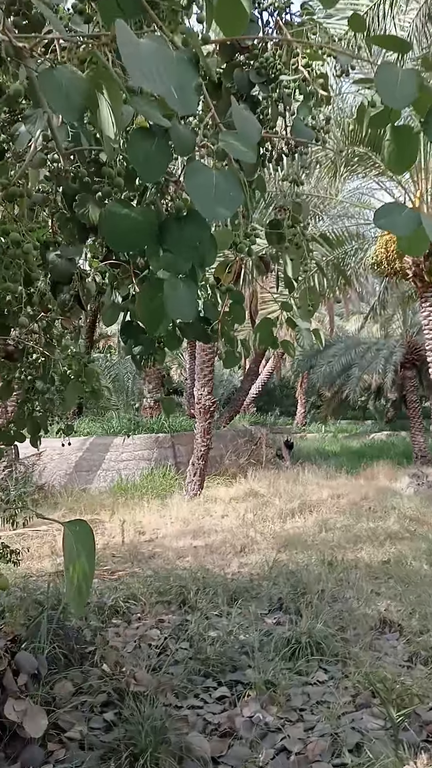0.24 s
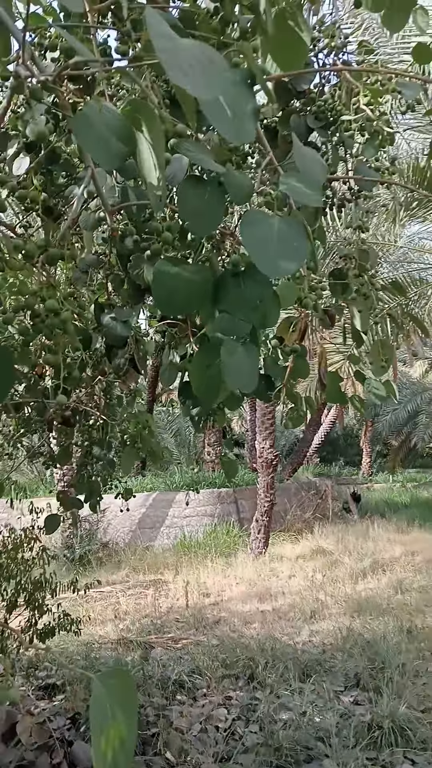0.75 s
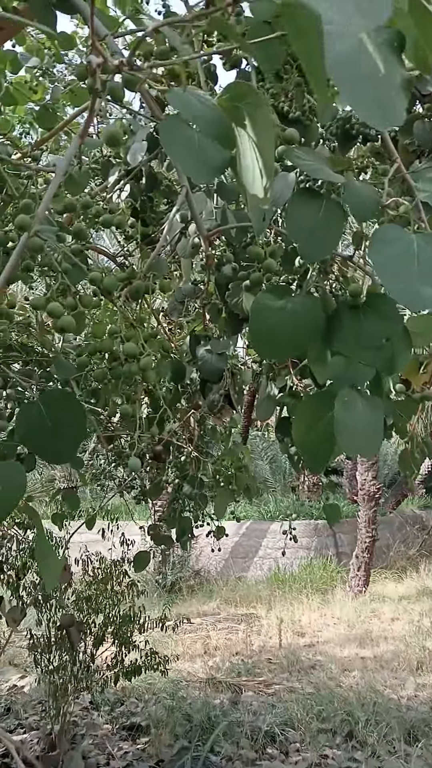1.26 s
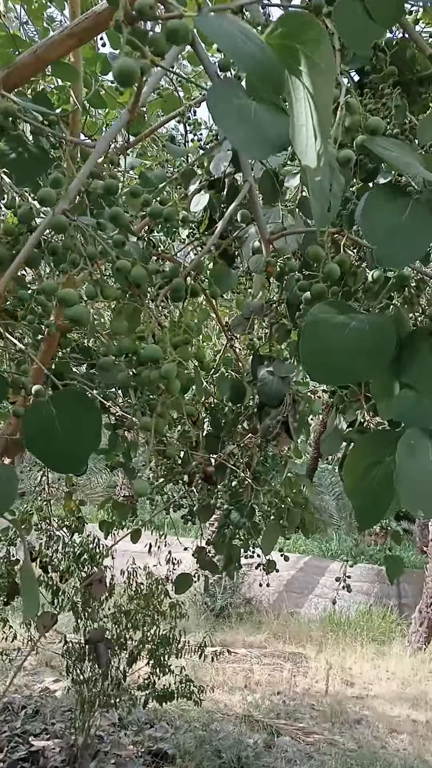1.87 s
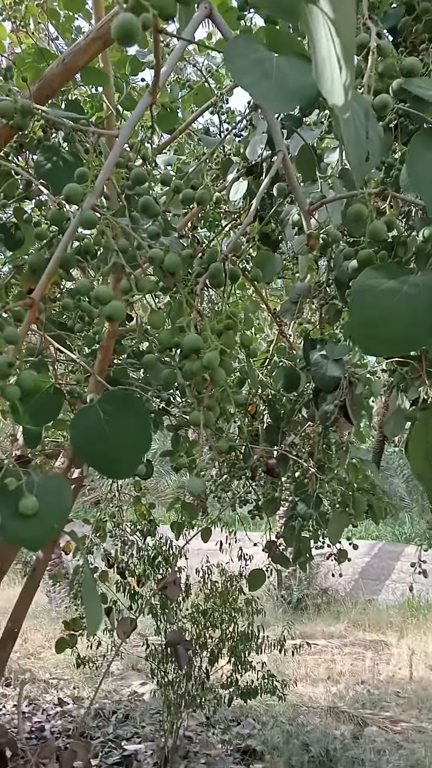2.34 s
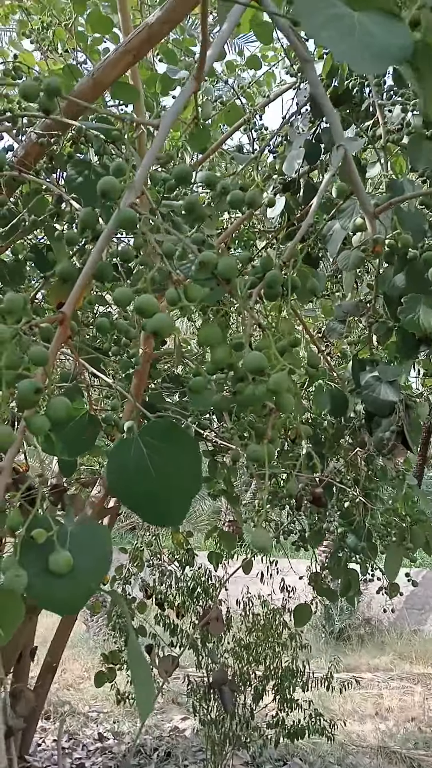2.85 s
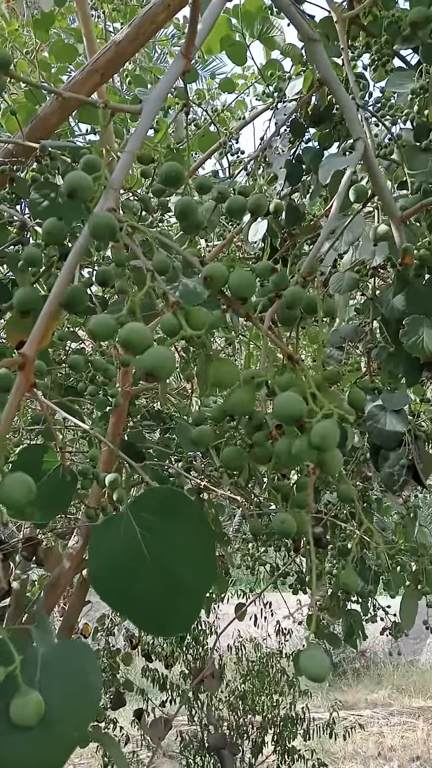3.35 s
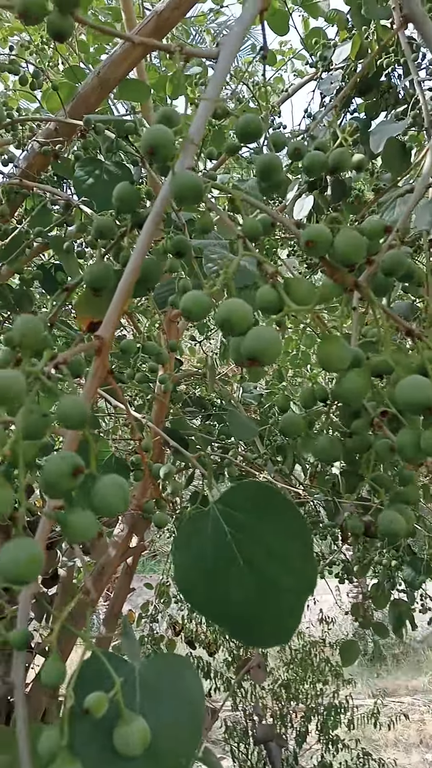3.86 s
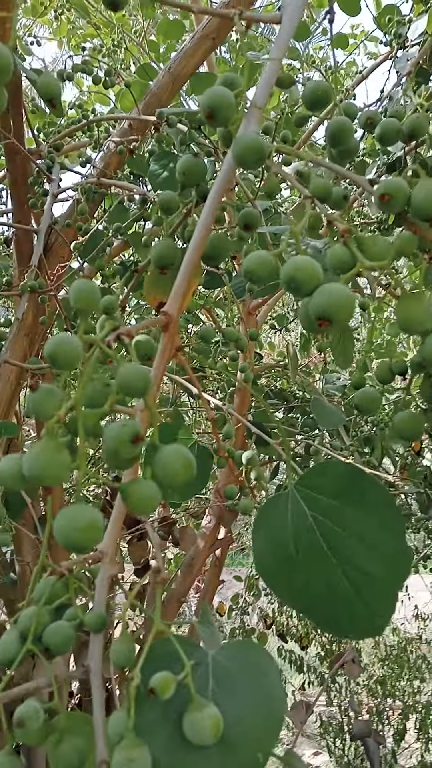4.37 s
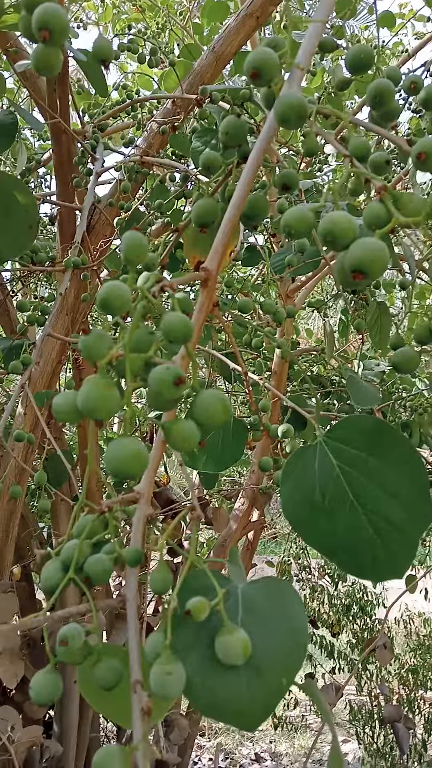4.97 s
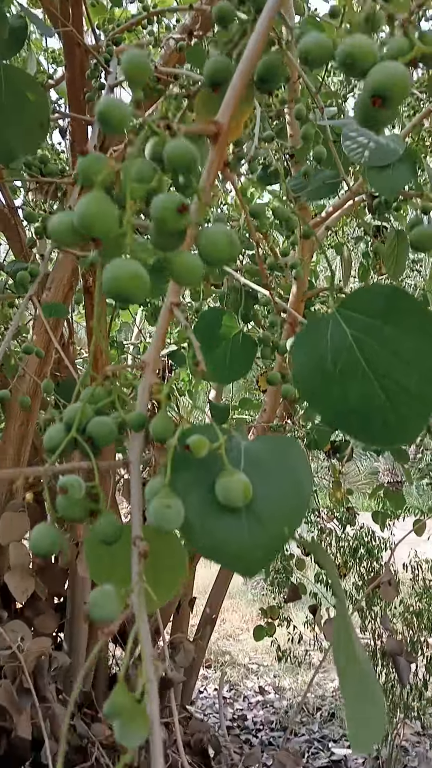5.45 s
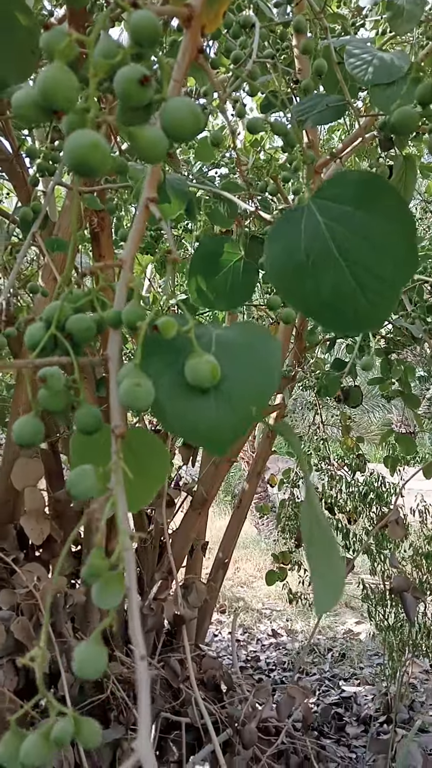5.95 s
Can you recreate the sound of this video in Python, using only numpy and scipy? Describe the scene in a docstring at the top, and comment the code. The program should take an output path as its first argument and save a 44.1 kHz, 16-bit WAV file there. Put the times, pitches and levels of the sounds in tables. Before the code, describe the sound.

Close, bright mono sound of slow walking over dry leaves and grass in a quiet orchard. At 0 s a loud crunch is already under way, a dense crackle with sharp snaps and a few dull sole knocks near 0.2 s, easing by 0.4 s. Lighter rustles follow from 0.5 to 1.0 s, with small stick clicks near 1 s. Firmer crunches come at 1.2-1.7 s and crisp snaps around 1.9-2.0 s. From about 2.1 to 2.6 s it lulls, with a barely audible low bump near 2.2 s. The strongest presses hit at 2.7-3.5 s, dip, and hit again at 3.9-4.1 s with a fuller crunch. Then the tread stops: sparse snaps until 4.7 s, then faint rustles and ticks. A very faint, brief, low-mid distant tone sounds at 5.2 s. Small crackles around 5.5 and 5.9 s finish over soft, steady outdoor air.

```python
"""Someone walks slowly over dry leaves and grass in an orchard, close to a small microphone.
Each press of a foot is a dense crackle of random fractures, with single snaps and damped, resonant knocks.
After a soft low bump and a lull near 2.2 s the tread returns strongly, with loud presses up to about 4 s.
Then the walker stops under a tree and the crackle grows faint; at 5.2 s a short far tone of harmonics sounds.
Quiet outdoor air, made of filtered noise, lies behind it all."""
import sys
import numpy as np
from scipy import signal
from scipy.fft import rfft, irfft, next_fast_len
from scipy.io import wavfile
from scipy.ndimage import uniform_filter1d, map_coordinates

SR = 44100
rng = np.random.default_rng(int(sys.argv[2]) if len(sys.argv) > 2 else 0)


def dump_mix(stems):
    """Bounce the given channels to the path in sys.argv[1] as a 16-bit WAV at rate SR."""
    frames = np.atleast_2d(stems).T  # one column per channel
    limited = np.clip(frames, -1, 1)  # hard clip at full scale
    pcm = np.round(limited * 32767).astype(np.int16)
    wavfile.write(sys.argv[1], SR, pcm)


N = 273861
TIME = np.arange(N) / SR  # seconds

# Presses of a foot into the litter; crisp crackle and crushed body have relative levels:
# full_level_s, attack_s, hold_s, release_s, crisp_db, body_db
FOOT_PRESSES = [(0.025, 0.15, 0.087, 0.37, -21, -27), (.46, 0.042, 0.018, 0.063, -29.5, -35.5),
                (0.581, 0.045, 0.073, 0.097, -32.5, -39), (.715, 0.025, 0.031, 0.12, -33, -40),
                (0.999, 0.12, 0.0047, 0.13, -33.5, -38.5), (1.154, 0.076, 0.0065, 0.09, -26.5, -27.5),
                (1.245, 0.076, 0.048, 0.54, -23, -26.5), (1.471, 0.067, 0.093, 0.051, -29.5, -34.5),
                (1.627, 0.031, 0.014, 0.21, -26, -32), (1.809, 0.072, 0.053, 0.17, -31.5, -37.5),
                (1.93, 0.054, 0.0085, 0.17, -22, -33), (2.043, 0.028, 0.01, .11, -24, -34.5),
                (2.163, 0.22, 0.022, .9, -47, -51.5), (2.72, 0.044, 0.12, 0.073, -16.5, -24.5),
                (2.996, 0.063, 0.076, 0.28, -19, -27), (3.155, .08, 0.011, 0.13, -21, -29.5),
                (3.294, 0.13, 0.026, .08, -28, -36), (3.453, 0.063, 0.073, 0.098, -25.5, -33.5),
                (3.692, 0.14, 0.043, .2, -42.5, -46.5), (3.904, 0.076, 0.011, 0.062, -17.5, -23.5),
                (4.007, 0.037, 0.031, 0.42, -24.5, -31), (4.334, 0.11, .01, 0.043, -35.5, -37),
                (4.485, 0.088, 0.025, 0.18, -45, -51.5), (4.689, 0.19, 0.0068, 0.13, -39, -46),
                (4.766, .06, .03, 0.029, -53, -53.5), (4.993, 0.02, 0.011, 0.056, -49, -56),
                (5.158, .03, 0.22, 0.19, -53.5, -59), (5.533, 0.14, .01, .25, -45.5, -52.5),
                (5.893, 0.22, 0.11, 0.36, -44, -49)]
# Slow change of bass in the crunch: time_s, bass_gain_db
CRUNCH_BASS = [(0, -3.5), (0.7, 2), (1.3, -5), (2.0, -4), (2.8, 2), (3.4, 0.5), (3.9, 6), (4.4, -2.5),
               (6.2, 5.5)]
# Spectrum of the crushed litter: frequency_hz, relative_level_db
LITTER_SPECTRUM = [(35, -77), (60, -37.5), (226, -14.5), (278, -15.5), (394, -15.5), (433, -11), (756, -14),
                   (1350, -10.5), (1830, -8), (2590, -8.5), (4320, -4), (7720, -1.5), (9510, -2),
                   (10900, -5), (15500, -9)]
# Leaves and twigs that snap out of the crackle, relative levels, decay time constant of the amplitude:
# start_s, crisp_peak_db, body_rms_db, ring_hz, breaking_s
LEAF_SNAPS = [(0.0142, -10, -33, 2120, 0.0022), (0.0303, 1, -20, 3800, 0.0026),
              (0.0618, -1.5, -21.5, 1850, 0.0014), (0.0877, -4.5, -20.5, 1800, 0.0015),
              (0.142, -7.5, -25.5, 2190, 0.0025), (0.1666, -12.5, -30, 3860, 0.0017),
              (0.189, -24, -26.5, 1410, 0.0028), (0.2153, -16, -31, 3940, 0.0024),
              (0.3448, -15.5, -27, 1670, 0.0021), (0.382, -14.5, -27, 4200, 0.0023),
              (0.4596, -8, -21.5, 1880, 0.0046), (0.4724, -15, -28.5, 3890, 0.0019),
              (0.5366, -20.5, -38, 4300, 0.0037), (0.5676, -14.5, -37.5, 4400, 0.0016),
              (0.6098, -12.5, -34, 2020, 0.0025), (0.6648, -18, -35, 4110, 0.002),
              (0.719, -18, -48, 4080, 0.0025), (0.8025, -11.5, -33.5, 4330, 0.001),
              (0.842, -25.5, -38.5, 4800, 0.0084), (1.0886, -27, -37, 1590, 0.0035),
              (1.1541, -15, -23, 2110, 0.0038), (1.2281, -8.5, -20, 3700, 0.002),
              (1.2406, -10, -21.5, 2130, 0.0028), (1.2473, -13, -17, 4050, 0.003),
              (1.2645, -9.5, -20, 3230, 0.0019), (1.2806, -7, -22.5, 1690, 0.0028),
              (1.381, -8, -27.5, 1600, 0.0014), (1.471, -10.5, -31.5, 3400, 0.0022),
              (1.5356, -9, -34, 4800, 0.0022), (1.6079, -19, -24.5, 1960, 0.002),
              (1.6385, -10.5, -22.5, 1980, 0.0032), (1.7125, -10, -24.5, 2120, 0.0054),
              (1.845, -15, -27.5, 4250, 0.0023), (1.8866, -9, -29.5, 2100, 0.0011),
              (1.9197, -2.5, -28.5, 2420, 0.0017), (1.9366, -7.5, -36, 3700, 0.0033),
              (1.9793, -7, -25.5, 5280, 0.0011), (2.0002, -4, -28, 4780, 0.0023),
              (2.4657, -33, -37.5, 1820, 0.0032), (2.6058, -25.5, -51, 5030, 0.00095),
              (2.6789, -11.5, -30.5, 4430, 0.0078), (2.7057, -2.5, -21, 2300, 0.0067),
              (2.723, -9, -26, 3800, 0.0045), (2.7335, -4.5, -22, 4270, 0.003),
              (2.8744, -7, -44, 3120, 0.0028), (2.9489, -11, -30.5, 1620, 0.0023),
              (2.9694, -5, -30.5, 5140, 0.0024), (2.9915, -3.5, -25, 4900, 0.0043),
              (3.251, -12, -31, 4500, 0.0028), (3.417, -20, -39, 4200, 0.0024),
              (3.6422, -26.5, -38, 4520, 0.0025), (3.7618, -29, -38.5, 5030, 0.0052),
              (4.0783, -24, -31, 2310, 0.0028), (4.1924, -11, -31, 3630, 0.0057),
              (4.2926, -13.5, -36.5, 3960, 0.0051), (4.4047, -22.5, -49, 3900, 0.0041),
              (4.4804, -18.5, -35.5, 4150, 0.0042), (4.6942, -19.5, -41.5, 4180, 0.0028),
              (4.8189, -48, -46.5, 5070, 0.0016), (4.9908, -42, -52.5, 2080, 0.0028),
              (5.014, -36.5, -45.5, 1870, 0.0021), (5.0613, -35, -52.5, 2070, 0.0028),
              (5.225, -36, -52, 3140, 0.0031), (5.3353, -49, -49.5, 3990, 0.0045),
              (5.4635, -31.5, -41.5, 3820, 0.0063), (5.5235, -26.5, -43.5, 4050, 0.0031),
              (5.6024, -34, -45, 3320, 0.0011), (5.9163, -19, -36.5, 4130, 0.0016),
              (6.0558, -28.5, -51, 1850, 0.0021), (6.1206, -27.5, -46.5, 4060, 0.0032)]
# Spectrum of a single snap before its ring is added: frequency_hz, relative_level_db
SNAP_SPECTRUM = [(40, -34), (150, -22.5), (400, -9), (900, -9.5), (1900, -1.5), (2800, -2), (4100, 3),
                 (5500, 5), (8000, 11.5), (11500, 5), (15500, 6)]
# Dull knocks of soles on the soil, relative levels, time to fall by 60 dB:
# start_s, level_db, pitch_hz, t60_s
SOLE_KNOCKS = [(0.193, -26.5, 407, 0.16), (0.212, -30, 170, 0.066), (0.221, -28.5, 288, 0.064),
               (0.238, -33, 192, 0.066), (2.734, -24, 426, 0.043), (3.891, -32, 490, 0.064),
               (3.912, -22, 412, 0.025), (4.692, -35.5, 390, 0.02), (5.521, -39, 372, 0.029),
               (5.912, -36, 420, 0.034)]
# Light sticks that click against each other, relative levels: start_s, level_db, pitch_hz, t60_s
STICK_CLICKS = [(0.995, -28.5, 1190, 0.09), (1.03, -32.5, 993, 0.044), (3.761, -39, 1030, 0.061),
                (4.569, -39.5, 548, 0.035), (5.667, -51.5, 960, 0.035), (5.963, -43.5, 835, 0.03)]
# Spectrum of the still air: frequency_hz, relative_level_db
AIR_SPECTRUM = [(15, -35), (25, -20), (113, -2), (188, -5.5), (722, -11.5), (2920, -8.5), (3530, -12),
                (3830, -13.5), (7910, -8), (9300, -13.5), (12000, -18), (15500, -29)]
# Partials of the far tone: frequency_multiple (no unit), relative_level_db
TONE_PARTIALS = [(1, 0), (2, 0), (3, -8), (4, -6), (5, -6), (6, -10)]
# Peaks and notch of the microphone port, Gaussian widths: centre_hz, width_hz, gain_db
PORT_RESONANCES = [(1850, 190, 1), (4190, 523, 4), (7810, 355, -4.5), (9510, 680, 7.5)]

SPLIT_HZ = 2700  # border between the body and the crisp part of a sound
TOP_HZ = 15700  # band limit of the microphone
LEAF_CUT_HZ = 100  # thin leaves radiate little below this
RAMP_DB = 20  # rise within an attack and fall within a release
# the hiss of leaves springing back after a press, its fading and its upper cut: duller than the crunch
SETTLE_DB, SETTLE_DB_PER_S, SETTLE_TOP_HZ = -23, 28, 10100
UNEVEN_DB, UNEVEN_PER_S = 1.5, 45  # the litter gives way in clumps
# rate of breaks at one crisp level, and the power by which it grows with the crisp gain
BREAKS_PER_S, BREAKS_AT_DB, BREAKS_GROW = 520, -27.5, .56
SCATTER_DB, SCATTER_S = -17, .012  # the crumbs and echoes that trail a snap
CRACK_RISE_S, RAGGED_DB = 0.00048, 2.2  # how fast a crack opens; how unevenly it runs
RING_DB, RING_WIDTH_HZ = 8, 400  # resonance of the piece that breaks
SNAP_CREST_DB = 22  # allowance for a snap's peak over its mean level
SNAP_CORE_S = 0.0072  # duration to which the body's energy is referred
# stray snaps: peak over the crackle, body over the crushed body, and the largest deviation of each
STRAY_DB, STRAY_BODY_DB, STRAY_SPREAD_DB = 7.5, -2.5, 3
# strays follow the crackle's level less than fully, so they stand out where it is quiet
STRAY_FOLLOW, STRAY_AT_DB = .85, -37
STRAY_LOW_HZ, STRAY_HIGH_HZ = 1090, 5560  # range of their pitches


def steps():
    """Load-dependent fracture: a harder press cracks louder and denser; the crunch's depth drifts over time."""
    crisp_gain, body_gain, settling = pressing()
    rate = BREAKS_PER_S * (crisp_gain / amp(BREAKS_AT_DB)) ** BREAKS_GROW
    litter = lambda hz: amp(along(LITTER_SPECTRUM, hz))
    body, crisp = split(colour(crackle(rate, spread_db=1.5), litter))

    bass = signal.sosfiltfilt(signal.butter(2, 520, fs=SR, output="sos"), body)
    bass_gain = amp(np.interp(TIME, *np.transpose(CRUNCH_BASS)))
    body = body + bass * (bass_gain - 1)
    crunch = amp(-0.9) * body_gain * unit(body) + amp(-4.0) * crisp_gain * unit(crisp)
    crunch *= amp(UNEVEN_DB * wobble(UNEVEN_PER_S))

    dull_litter = lambda hz: litter(hz) / np.hypot(1, (hz / SETTLE_TOP_HZ) ** 3)
    hiss = unit(colour(rng.standard_normal(N), dull_litter))
    return crunch + amp(SETTLE_DB) * settling * hiss


def pressing():
    """Summation of energy: presses swell, hold and decay exponentially; gives crisp, body and settling gains."""
    crisp, body, settling = np.zeros((3, N)) + 1e-12
    for full_s, attack, hold, release, crisp_db, body_db in FOOT_PRESSES:
        rise_db = RAMP_DB * np.minimum(TIME - full_s, 0) / attack
        since = np.maximum(TIME - full_s - hold, 0)
        shape = amp(np.maximum(rise_db - RAMP_DB * since / release, -120))
        crisp += (amp(crisp_db) * shape) ** 2
        body += (amp(body_db) * shape) ** 2
        settling_db = crisp_db + rise_db - SETTLE_DB_PER_S * since
        settling += amp(np.maximum(settling_db, -120)) ** 2
    return np.sqrt([crisp, body, settling])


def crackle(rate, spread_db, count=11):
    """Random impulses exciting resonances: breaks of unequal size, each favouring the pitches of its leaf."""
    size = amp(spread_db * np.minimum(rng.standard_normal(N), 1.7)) ** 2
    breaks = (rng.random(N) < rate / SR) * size
    leaves = np.zeros(N)
    for ring_hz in np.geomspace(330, 13000, count):
        share = amp(4.1 * np.minimum(rng.standard_normal(N), 2)) ** 2
        band = lambda hz: np.exp(-9 * np.log((hz + 1) / ring_hz) ** 2) + .05 / (1 + hz / 300)
        leaves += colour(fractures(breaks * share, rub_db=-6), band)
    # the soil under the leaves adds a dull grain
    soil = colour(fractures(breaks, rub_db=-1), lambda hz: 0.71 / (1 + (hz / 240) ** 4))
    return unit(leaves + soil)


def fractures(breaks, rub_db):
    """Shot noise: each break sets off a brief noise burst over the rub of leaf on leaf, at a steady level."""
    burst = fading(crack_s=.0008, scatter_db=-13, scatter_s=.005)
    energy = np.abs(signal.oaconvolve(breaks, burst)[:N])
    local_mean = uniform_filter1d(uniform_filter1d(energy, size=1300), size=1300)
    energy /= np.abs(local_mean) + 1e-4
    return np.sqrt(energy + amp(rub_db) ** 2) * rng.standard_normal(N)


def fading(crack_s, scatter_db, scatter_s):
    """Double exponential decay of energy: the crack itself, then its scatter from ground and foliage."""
    t = np.arange(SR // 20) / SR
    return np.exp(-2 * t / crack_s) + amp(scatter_db) ** 2 * np.exp(-2 * t / scatter_s)


def snaps(rows):
    """Brittle fracture: a sharp crack runs on raggedly, coloured by the resonance of the leaf or twig."""
    out = np.zeros(N + SR)
    for start_s, crisp_db, body_db, ring_hz, breaking_s in rows:
        energy = fading(breaking_s, SCATTER_DB, SCATTER_S)
        length = len(energy)
        opening = 1 - np.exp(-np.arange(length) / SR / CRACK_RISE_S)
        ragged = amp(RAGGED_DB * unit(uniform_filter1d(rng.standard_normal(length), size=30)))
        burst = opening * np.sqrt(energy) * ragged * rng.standard_normal(length)

        ring_db = lambda hz: RING_DB / (1 + ((hz - ring_hz) / RING_WIDTH_HZ) ** 2)
        body, crisp = split(colour(burst, lambda hz: amp(along(SNAP_SPECTRUM, hz) + ring_db(hz))))
        body /= np.sqrt(np.sum(body ** 2) / (SNAP_CORE_S * SR))
        snap = amp(crisp_db - SNAP_CREST_DB) * unit(crisp) + amp(body_db) * body
        out[round(start_s * SR):][:length] += snap
    return out[:N]


def strays(count=130):
    """Fracture strength follows load: small snaps at random moments, scaled by the press, as snap rows."""
    crisp_gain, body_gain, _ = pressing()
    when, pitch, crisp_size, body_size = rng.random((count, 4)).T
    at = (when * N).astype(int)
    crisp_db, body_db = 20 * np.log10([crisp_gain[at], body_gain[at]])
    lift_db = (STRAY_FOLLOW - 1) * (np.maximum(crisp_db, -60) - STRAY_AT_DB)
    crisp_db += lift_db + STRAY_DB + STRAY_SPREAD_DB * (2 * crisp_size - 1)
    body_db += lift_db + STRAY_BODY_DB + STRAY_SPREAD_DB * (2 * body_size - 1)
    ring_hz = STRAY_LOW_HZ * (STRAY_HIGH_HZ / STRAY_LOW_HZ) ** pitch
    breaking_s = np.full(count, .0014)
    return np.column_stack([at / SR, crisp_db, body_db, ring_hz, breaking_s])


def knocks(blows, level_db, sharpness):
    """Damped resonance: a decaying noise push excites one broad, short resonance at each blow."""
    out, t = np.zeros(N + SR), np.arange(SR // 8) / SR
    for start_s, db, pitch_hz, t60_s in blows:
        push = rng.standard_normal(len(t)) * amp(-60 * t / t60_s)
        detuning = lambda hz: hz / pitch_hz - pitch_hz / (hz + 1)
        thud = colour(push, lambda hz: 1 / np.hypot(1, sharpness * detuning(hz)) ** 2)
        out[round(start_s * SR):][:len(t)] += amp(db + level_db) * unit(thud)
    return out[:N]


def bounces(x, strength, delay_s, count=3):
    """Reflection: ground and trunks return weak copies, whose delays wander as the walker moves."""
    out = x.copy()
    for k in range(count):
        lag = delay_s * (k + 1) * SR * np.exp(.2 * wobble(5))  # samples
        out += strength * np.interp(np.arange(N) - np.round(lag), np.arange(N), x)
    return out / np.sqrt(1 + count * strength ** 2)


def background():
    """Filtered noise and harmonic synthesis: still air, one soft low bump and a short tone from far away."""
    air = unit(colour(rng.standard_normal(N), lambda hz: amp(along(AIR_SPECTRUM, hz))))
    air *= amp(-57.5 + 0.5 * wobble(4.43))

    bump = unit(colour(rng.standard_normal(N), lambda hz: 1 / (1 + ((hz - 72) / 18) ** 2)))
    bump *= amp(-56.0) * swell(2.235, 0.037)

    pitch_hz = 305 * (1 + 0.00695 * wobble(43))
    phase = 2 * np.pi * np.cumsum(pitch_hz) / SR
    tone = unit(sum(amp(db) * np.sin(multiple * phase) for multiple, db in TONE_PARTIALS))
    tone *= amp(-57.5 + 2.5 * wobble(60)) * swell(5.2, .03)
    return air + bump + tone


def swell(centre_s, width_s):
    """Gaussian envelope: a bell-shaped rise and fall."""
    return np.exp(-.5 * ((TIME - centre_s) / width_s) ** 2)


def wobble(rate):
    """Interpolated randomness: a smooth random curve with rate knots a second."""
    knots = rng.standard_normal(int(N * rate / SR) + 4)
    return map_coordinates(knots, [TIME * rate])


def colour(x, gain):
    """Minimum-phase filtering: folding the cepstrum makes a causal filter with the given gain against Hz."""
    size = 2 * next_fast_len(len(x) // 2 + 2048)
    cepstrum = irfft(np.log(np.maximum(gain(np.fft.rfftfreq(size, 1 / SR)), 1e-6)))
    cepstrum[1:size // 2] *= 2
    cepstrum[size // 2 + 1:] = 0
    return irfft(rfft(x, size) * np.exp(rfft(cepstrum)), size)[:len(x)]


def split(x):
    """Band division: low-pass and high-pass filters give the body and the crisp part of a sound."""
    filters = [signal.butter(3, SPLIT_HZ, side, fs=SR, output="sos") for side in ("low", "high")]
    return [signal.sosfilt(sos, x) for sos in filters]


def along(points, hz):
    """Logarithmic interpolation: (Hz, value) points read on a log frequency axis."""
    f, v = np.transpose(points)
    return np.interp(np.log(hz + 1), np.log(f + 1), v)


def amp(db):
    """Level to amplitude: decibels become a linear gain."""
    return 10 ** (np.asarray(db) / 20)


def unit(x):
    """Power normalisation: scale to rms 1."""
    return x / np.sqrt(np.mean(x ** 2) + 1e-20)


def scene():
    """Superposition: steps, snaps and knocks add, are reflected, and stand before the background."""
    high_pass = lambda hz: hz ** 2 / np.hypot(hz ** 2, LEAF_CUT_HZ ** 2)
    leaves = colour(steps() + snaps(LEAF_SNAPS) + snaps(strays()), high_pass)
    blows = knocks(SOLE_KNOCKS, level_db=-18.5, sharpness=1.36)
    blows += knocks(STICK_CLICKS, level_db=-15.5, sharpness=2.1)
    return (bounces(leaves + blows, strength=0.17, delay_s=.0012) + background())[None]


def record(dry):
    """Resonance and saturation: the port colours the treble, hard cracks are rounded, the band is limited."""
    bell = lambda hz, centre, width: np.exp(-.5 * ((hz - centre) / width) ** 2)
    port_db = lambda hz: sum(db * bell(hz, centre, width) for centre, width, db in PORT_RESONANCES)
    x = colour(dry[0], lambda hz: amp(port_db(hz)))
    x = x / (1 + (x / .8) ** 4) ** .25
    size = next_fast_len(N + SR // 4)
    passed = np.fft.rfftfreq(size, 1 / SR) < TOP_HZ
    return irfft(rfft(x, size) * passed, size)[None, :N]


dry = scene()
out = record(dry)
dump_mix(out)
```